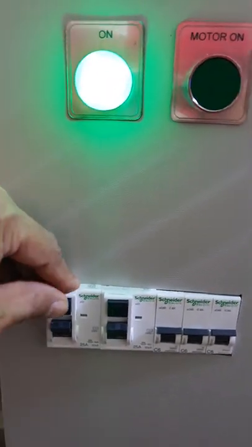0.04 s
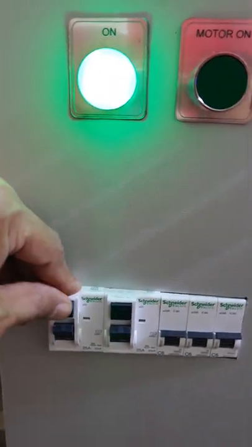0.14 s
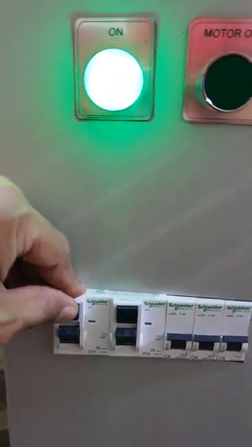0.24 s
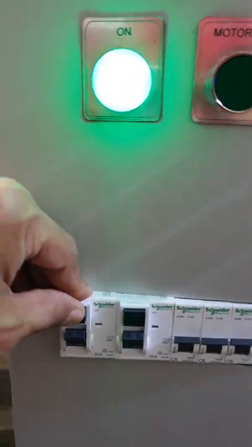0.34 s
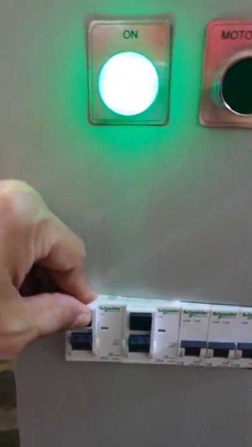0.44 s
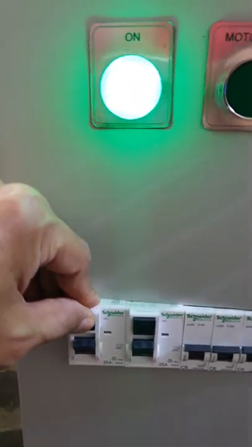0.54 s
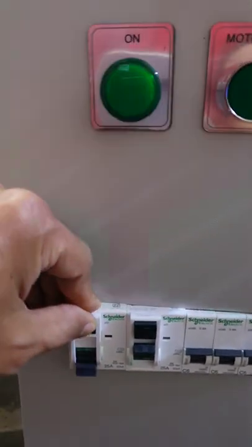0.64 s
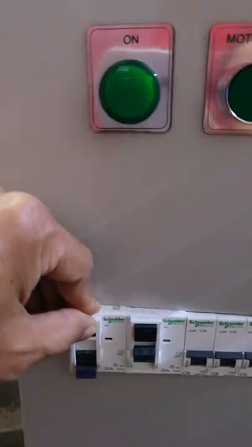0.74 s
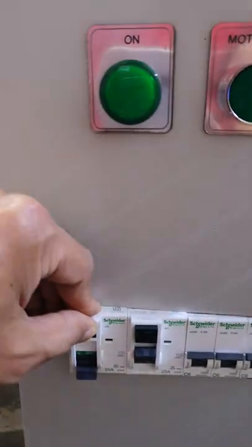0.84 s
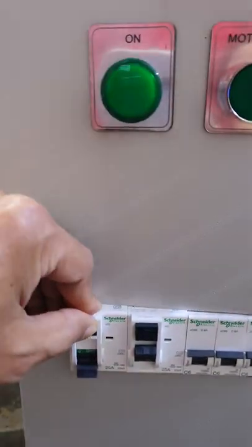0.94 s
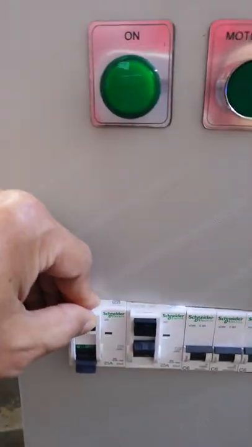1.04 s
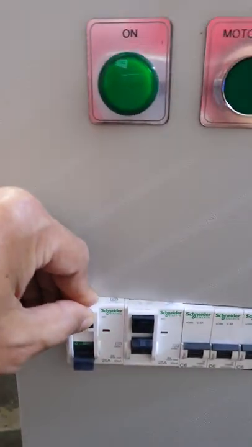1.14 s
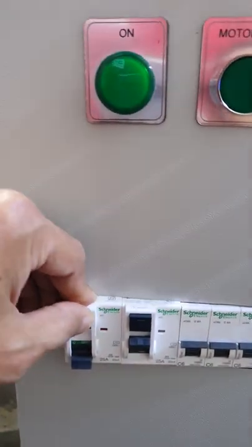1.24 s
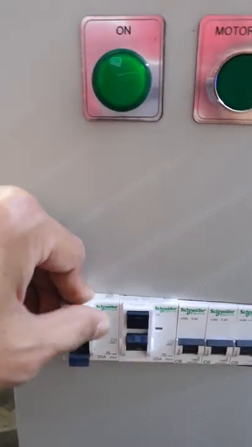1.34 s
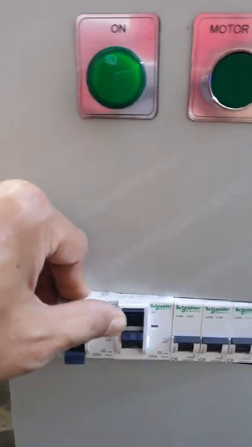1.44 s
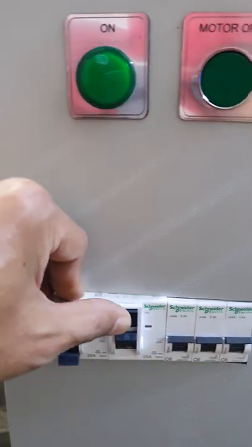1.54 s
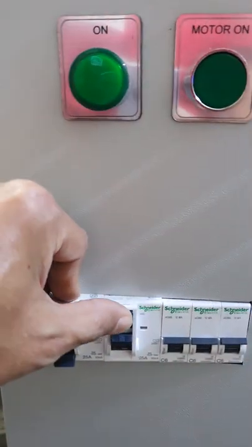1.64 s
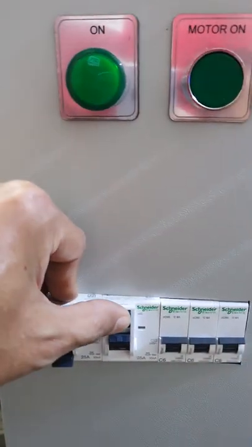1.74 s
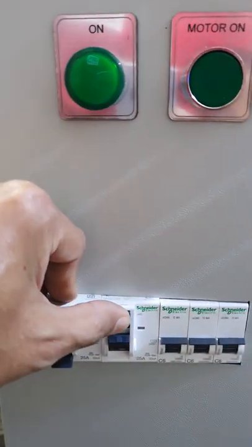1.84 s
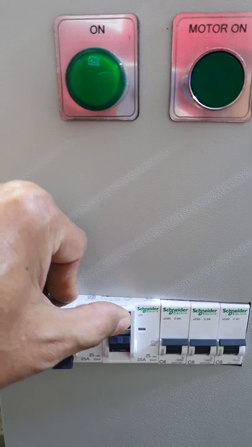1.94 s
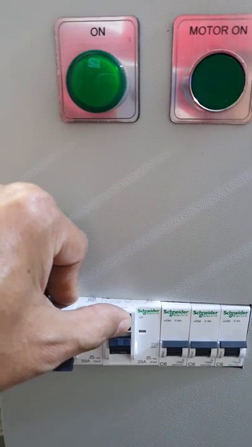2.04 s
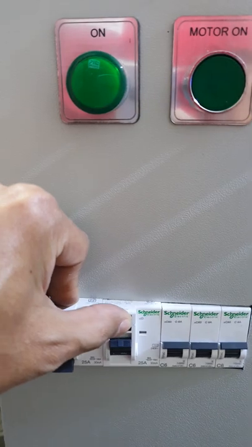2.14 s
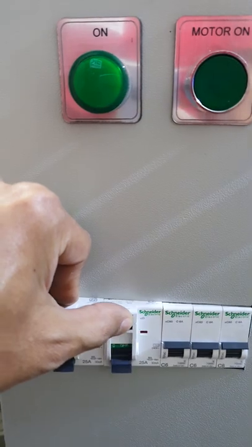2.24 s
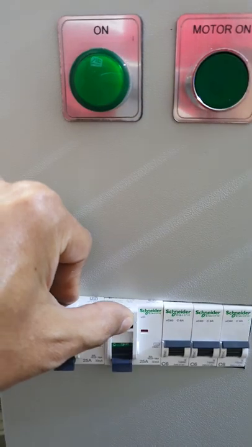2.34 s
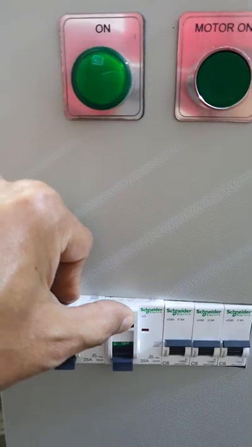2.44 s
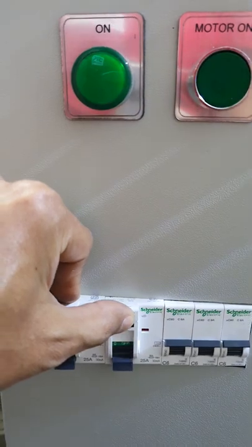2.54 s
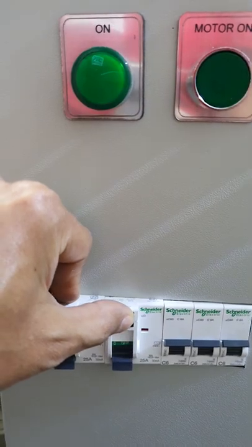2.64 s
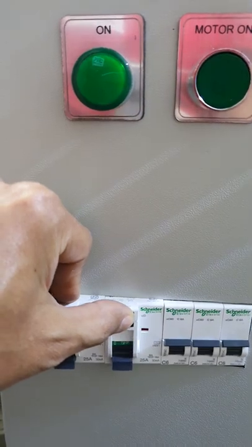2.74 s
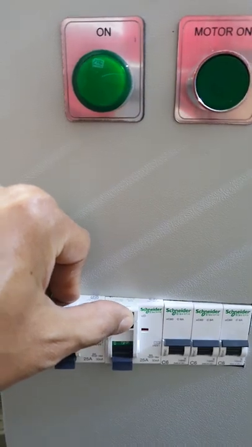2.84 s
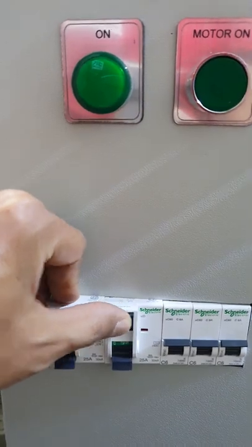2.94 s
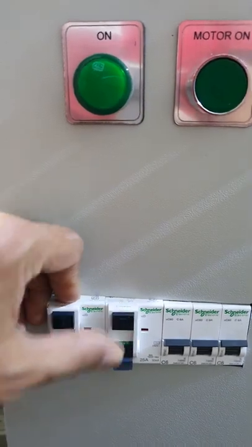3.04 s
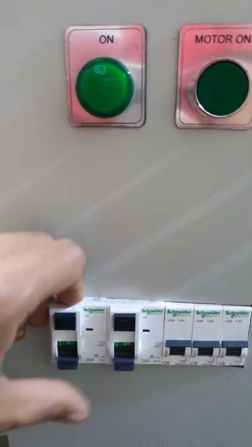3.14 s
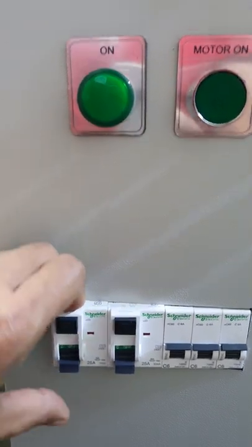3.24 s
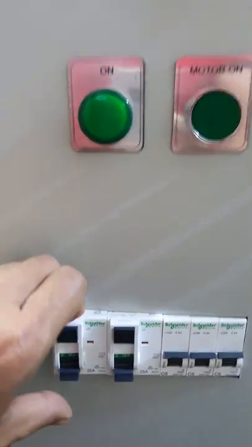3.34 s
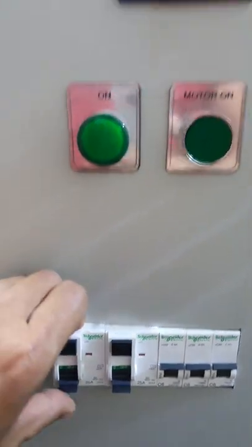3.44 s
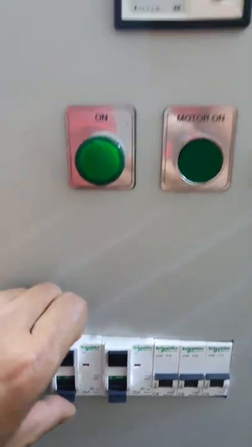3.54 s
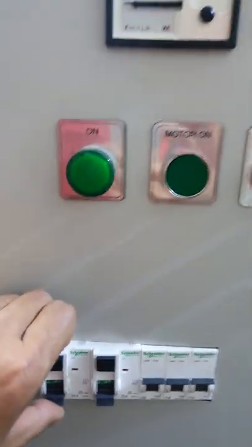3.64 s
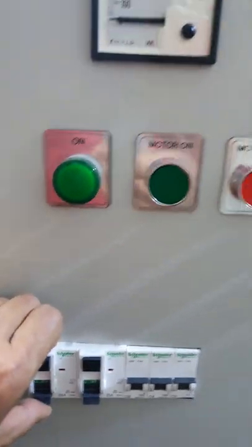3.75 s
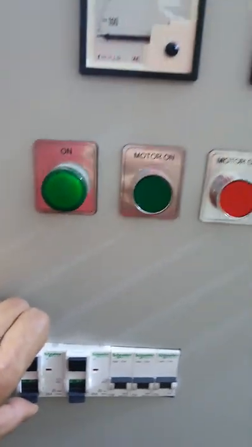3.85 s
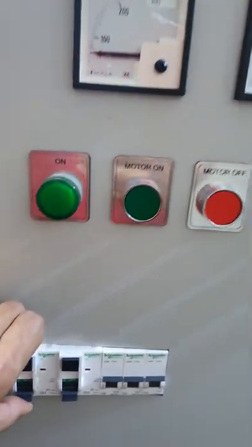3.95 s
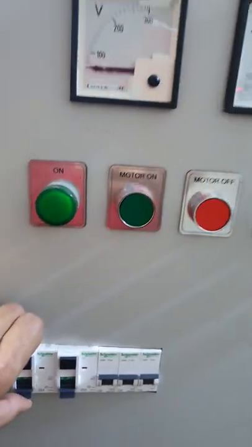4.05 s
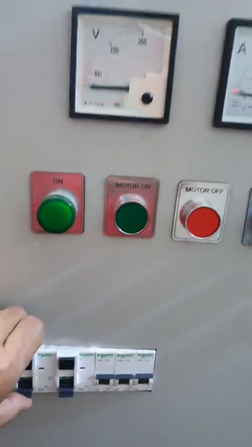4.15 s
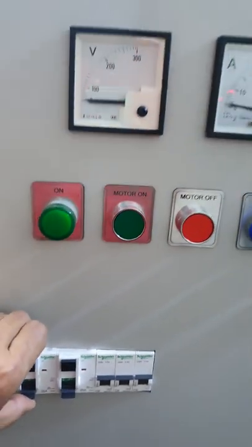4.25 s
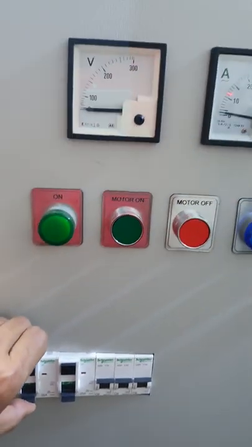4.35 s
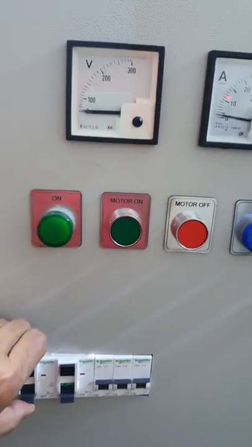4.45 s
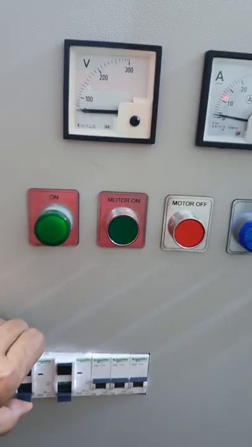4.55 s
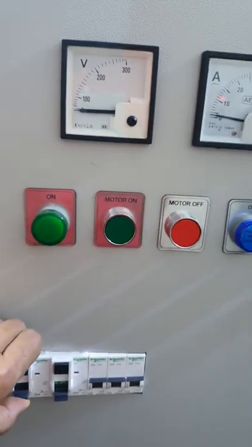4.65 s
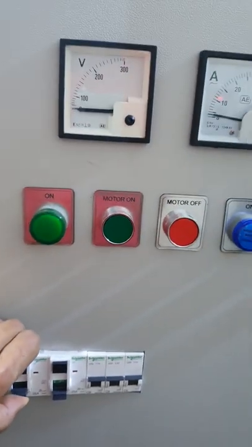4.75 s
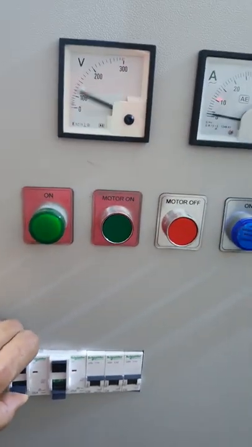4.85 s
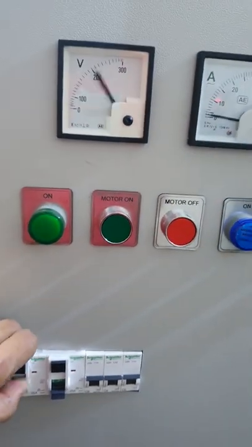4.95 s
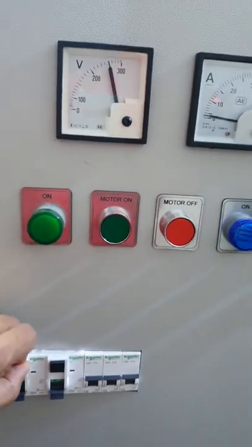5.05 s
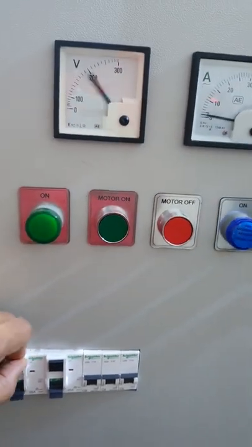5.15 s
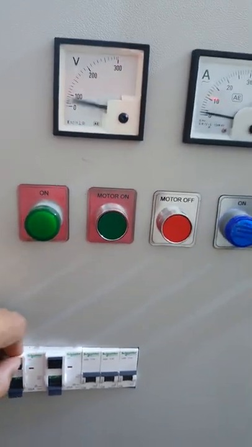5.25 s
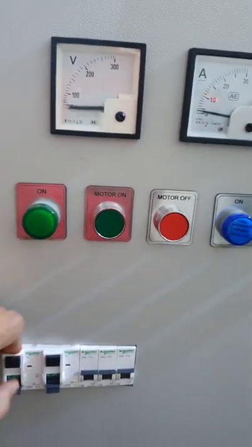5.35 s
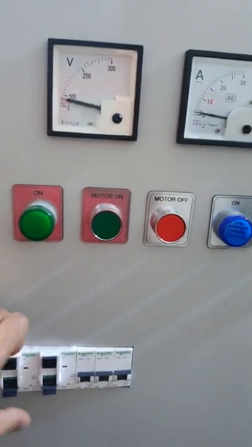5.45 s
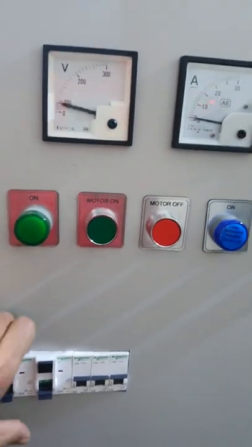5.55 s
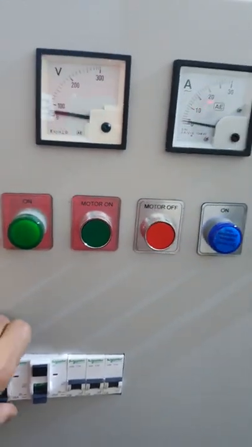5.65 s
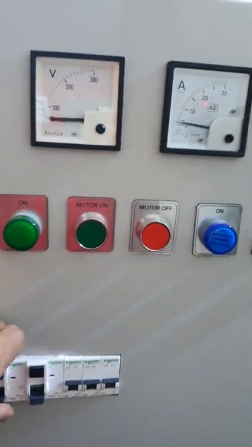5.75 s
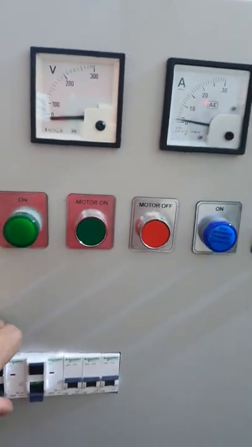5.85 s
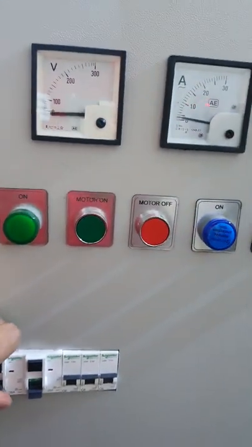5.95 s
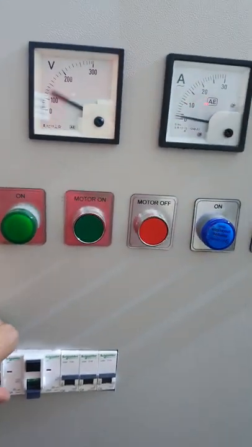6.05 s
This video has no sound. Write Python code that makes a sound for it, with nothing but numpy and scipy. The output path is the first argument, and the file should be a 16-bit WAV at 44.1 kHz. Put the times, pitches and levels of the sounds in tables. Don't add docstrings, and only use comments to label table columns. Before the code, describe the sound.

A phone held close to a sheet-steel electrical panel in a hard-walled plant room. Throughout there is a low, slightly swelling hum with soft hiss and two faint, wavering high whines around 2 kHz and above, from distant machines. A barely audible finger touch comes at 0.2 s. At 0.62 s a breaker lever drops: a loud, dense plastic clack of several tiny blows, followed by a hollow metal boom and about half a second of room ring. A crisp dry tick comes at 1.27 s. At 2.25 s a second, similar clack falls, its boom a little fuller. Quiet machine whine until light ticks at 4.8-4.9 s, then three quick knocks at 4.94, 4.98 and 5.02 s, the last hardest, with a short spring creak and ringing steel. Small ticks follow at 5.27 and 5.64 s, with faint touches near 5.95 s and a weak knock at 6.08 s as it ends.

```python
import sys
import numpy as np
from scipy import signal
from scipy.fft import rfft, irfft
from scipy.io import wavfile
from scipy.ndimage import uniform_filter1d

SR = 44100
rng = np.random.default_rng(int(sys.argv[2]) if len(sys.argv) > 2 else 0)


def to_linear_factor(level_db):
    exponent = np.asarray(level_db, float) / 20
    return 10 ** exponent


def wrap_up_sound(samples):
    columns = np.atleast_2d(samples).T
    tamed = np.clip(columns, -1, 1)
    steps = np.round(tamed * 32767).astype(np.int16)
    wavfile.write(sys.argv[1], SR, steps)


N = 269010
T = np.arange(N) / SR


def along(points, hz):
    f, v = np.transpose(points)
    return np.interp(np.log(np.maximum(hz, 1)), np.log(f), v)


def colour(x, points):
    c = irfft(np.log(to_linear_factor(along(points, np.fft.rfftfreq(2048, 1 / SR)))))
    c[1:1024] = 2 * c[1:1024]
    c[1025:] = 0
    response = irfft(np.exp(rfft(c)))
    return signal.fftconvolve(x, response[None], axes=1)[:, :x.shape[1]]


def fade(t, t60):
    return np.exp(-np.log(1000) * t / t60)


def ring(modes, seconds):
    t = np.arange(int(seconds * SR)) / SR
    return sum(to_linear_factor(db) * np.sin(2 * np.pi * hz * t) * fade(t, t60) for hz, db, t60 in modes)


def add(out, s, x):
    i = int(s * SR)
    out[:, i:i + x.shape[1]] += x[:, :N - i]


def sides(pan_db):
    return to_linear_factor(np.array([pan_db, -pan_db]) / 2).reshape(2, -1)


def walk(rate):
    k = int(SR / rate)
    held = np.repeat(rng.standard_normal(N // k + 1), k)
    return 1.3 * uniform_filter1d(uniform_filter1d(held, k), k)[:N]


# f/Hz, likeness/0-1
PORT_LIKENESS = [(60, 0.95), (130, 0.8), (290, 0.3), (640, 0.5), (1400, 0), (16000, 0.23)]


def pair(size):
    alike = np.clip(along(PORT_LIKENESS, np.fft.rfftfreq(size, 1 / SR)), 0, 1)
    mid, side = rfft(rng.standard_normal((2, size)))
    return np.sqrt((1 + alike) / 2) * mid + np.sqrt((1 - alike) / 2) * side * np.array([[1], [-1]])


# f/Hz, level/dB per Hz
HUM_TONE = [(25, -28), (70, 1.5), (130, -6), (250, -12.5), (500, -14.5), (900, -18), (1400, -22),
            (1900, -16.5), (3200, -22.5), (4000, -30), (5000, -40), (6900, -45), (7150, -51.5),
            (13000, -47.5), (16500, -60.5)]
# t/s, level/dB about the mean
PLANT_LEVEL = [(0, 3), (.5, 1), (1.2, 0), (1.6, 0), (1.69, -1.5), (1.8, 0), (2.2, 2.5), (2.7, 0.5),
               (3.11, -1.5), (3.42, -2), (3.5, 0.5), (4.3, 1), (4.6, 1), (4.9, 2), (5.5, -1.5), (5.95, -1),
               (6.05, -0.5)]
# t/s, left minus right/dB
PHONE_TURN = [(0, -4), (.3, -6), (.55, -4), (1.1, -4), (1.6, 2), (2.7, 0), (3.1, -2.5), (3.45, -6.5),
              (4.2, -5), (5.6, -11.5), (6.05, -9)]
# f/Hz, level/dB, wander/Hz, gain/dB per dB the phone turns left
WEAK_LINES = [(140, -68, 6, 0), (204.6, -73, 7, 0), (263.8, -72, 3, 0), (392, -76, 4, .3),
              (1070, -80, 1, -.5), (1110, -76, .5, 0), (1604, -77, .6, -.2), (2272, -81, .6, -.9),
              (2363, -80, 3, 0), (2638, -76, .6, .8), (3208, -81, .8, .3), (3332, -82, .8, 0),
              (500.6, -79, 3, 0), (2541, -88, .6, -.8), (2805, -86, .6, -.9), (3467, -85, 1, .4),
              (3860, -89, 2, 0), (4150, -90, 1, .3)]


def hum():
    hz, noise, out = np.fft.rfftfreq(N, 1 / SR), pair(N), 0
    plant_db, rumble_db = np.interp(T, *np.transpose(PLANT_LEVEL)), 2.9 * walk(5)
    noise = noise * to_linear_factor(along(HUM_TONE, hz) - 34)
    for centre in 30 * 2. ** np.arange(10):
        share = np.clip(1 - abs(np.log2(np.maximum(hz, 1) / centre)), 0, 1)
        swell_db = 1.3 * plant_db + rumble_db if centre < 200 else plant_db
        reach = np.clip(3500 / centre, 0, 1)
        out = out + irfft(noise * share, N) * to_linear_factor(reach * (swell_db + 0.65 * walk(2.5)))
    turn_db = np.interp(T, *np.transpose(PHONE_TURN))
    for line_hz, db, wander_hz, facing in WEAK_LINES:
        phase = 2 * np.pi * np.cumsum(line_hz + wander_hz * walk(8)) / SR
        lag = min(line_hz / 1500, .7)
        level = to_linear_factor(db + facing * turn_db + 5.5 + 0.99 * walk(1.6))
        out = out + level * np.sin(phase + np.array([[lag], [-lag]]))
    return out


# t/s, 4th harmonic level/dB, 5th harmonic level/dB
WHINE_A = [(0, -68, -62.5), (.5, -67.5, -67), (1.1, -68.5, -70.5), (1.699, -66, -76), (2.2, -62, -68.5),
           (2.9, -64.5, -68), (3.15, -66.5, -73.5), (3.5, -65, -75), (3.74, -60.5, -88), (3.95, -61.5, -72),
           (4.2, -79.5, -62), (4.88, -81, -61.5), (5.45, -73, -63.5), (5.7, -72.5, -70),
           (6.05, -72.5, -62.5)]
WHINE_B = [(0, -70, -56.5), (.25, -75, -59), (.95, -76.5, -63.5), (1.401, -76, -65.5), (1.65, -68, -67),
           (1.9, -69.5, -73.5), (2.2, -64, -70.5), (2.7, -67.5, -68), (3.05, -67.5, -75.5),
           (3.37, -70.5, -66.5), (3.58, -65.5, -64), (3.77, -60, -70), (3.91, -59.5, -61),
           (4.31, -64.5, -59), (4.88, -66, -59.5), (5.55, -67.5, -66.5), (5.77, -67.5, -62),
           (6.05, -65.5, -62.5)]


def whine(start_hz, creep, table, fifth_turn):
    s, fourth_db, fifth_db = np.transpose(table)
    turn_db = np.interp(T, *np.transpose(PHONE_TURN))
    phase = 2 * np.pi * np.cumsum(start_hz + creep * T + 0.92 * walk(12)) / SR
    out = 0
    for ratio, db, pan_db in ((1, fourth_db, turn_db), (5 / 4, fifth_db, -2.5 + fifth_turn * turn_db)):
        lag = .6 + .12 * walk(1.5)
        level = to_linear_factor(np.interp(T, s, db) + 4.5 + walk(11))
        out = out + level * sides(pan_db) * np.sin(ratio * phase + np.array([lag, -lag]))
    return out


# f/Hz, t60/s, level/dB
ROOM_RING = [(252, .6, -41), (500, .55, -28.5), (1007, 0.45, -26), (2000, .42, -30.5), (4000, 0.37, -28),
             (5900, .37, -33), (9000, .32, -33.5), (13960, .27, -31.5)]
# f/Hz, level/dB
CASE_TONE = [(150, -33), (400, -10.5), (900, -11), (1250, -7.5), (1600, -8.5), (2500, -3.5), (3500, -7),
             (4600, -9), (5800, -8.5), (7000, -14.5), (7600, -21), (12000, -17.5), (15400, -26.5),
             (16500, -48)]


def room(feeds):
    late_db, late_stretch = -15, 1.515
    hz, t = np.fft.rfftfreq(N, 1 / SR), T[::32]
    f, t60, db = np.transpose(ROOM_RING)
    noise, out = pair(N), 0
    noise = noise * to_linear_factor(2.2 * walk(120)[:len(hz)])
    age = np.maximum(t - np.array([[s] for s, _ in feeds]), 0)
    for centre in 125 * 2 ** np.arange(0, 7.6, .5):
        share = np.clip(1 - 2 * abs(np.log2(np.maximum(hz, 1) / centre)), 0, 1)
        feed_db = np.array([[along(points, centre)] for _, points in feeds])
        gain = to_linear_factor(feed_db + along(np.c_[f, db], centre))
        ring_s = along(np.c_[f, t60], centre)
        decay = fade(age, .85 * ring_s) + to_linear_factor(late_db) * fade(age, late_stretch * ring_s)
        swell = gain * decay * (1 - np.exp(-age / 0.0075))
        level = np.interp(T, t, np.sqrt((swell ** 2).sum(0)))
        out = out + irfft(noise * share, N) * level * to_linear_factor(1.6 * walk(45))
    return colour(out, CASE_TONE)


# t/s, level/dB, rise/s,
# grip (0 first lever drops, 1 second lever drops, 2 lever closes, 3 light knock)
DOOR_SHOCKS = [
    (.618, 5.5, 0.019, 0),
    (2.250, 5.5, 0.028, 1),
    (4.535, -25, .045, 2),
    (4.941, 0.5, 0.016, 3),
    (4.98, -3.5, 0.0095, 3),
    (5.023, 1.5, 0.011, 2),
    (6.084, -6.5, 0.0068, 3),
]
# f/Hz, t60/s, level/dB for grips 0, 1, 2
DOOR_MODES = [(53, 1.7, -39, -41, -58), (72.07, .8, -43, -43, -51.5), (115, .6, -29.5, -30.5, -34.5),
              (143.5, 0.53, -36, -26.5, -41.5), (164.7, .64, -26.5, -20.5, -26.5),
              (171.14, .3, -15, -23, -25), (194.3, 0.3, -23.5, -18.5, -16), (219.2, 1.065, -30, -34, -30.5),
              (260.3, .5, -31, -31, -35), (302, 0.38, -32, -34.5, -35.5), (335, 0.65, -33, -31, -29.5),
              (396.5, 0.7, -30.5, -25, -31.5), (425, 0.59, -35.5, -32.5, -26),
              (455.4, 0.49, -33.5, -37.5, -36), (504, .35, -37.5, -33.5, -50),
               (553, 0.48, -45, -30, -50.5), (589.4, .45, -32.5, -37.5, -49.5),
               (635, 0.43, -41, -34.5, -41), (740, 0.2, -37, -27.5, -31.5), (748, .3, -39.5, -49, -29.5),
               (887, 0.34, -41, -39.5, -38.5), (1184, 0.1192, -24.5, -23, -40),
               (1250, 0.13, -22.5, -25.5, -31)]
# f/Hz, level/dB
KNOCK_TONE = [(75, -57.5), (110, -34), (250, -36.5), (400, -32), (550, -54.5), (700, -33.5), (1250, -36)]


def door():
    slow = 10
    out, t = np.zeros((2, N)), T[:88200:slow]
    table = np.array(DOOR_MODES)
    table = np.c_[table, along(KNOCK_TONE, table[:, 0])]
    hz, t60 = table[:, :1], table[:, 1:2]
    for s, db, rise, grip in DOOR_SHOCKS:
        build = 1 - np.exp(-t / (rise * (t60 / .35) ** 1.2))
        level = to_linear_factor(table[:, 2 + round(grip), None] + db) * fade(t, t60) * build
        boom = 0
        for share, spread in ((0.88, 0.001), (0.5, .03), (0.54, .06), (0.42, .012)):
            start, skew, detune = rng.standard_normal((3, len(hz), 1))
            phase = 2 * np.pi * hz * (1 + spread * detune) * t + 2 * start
            skew = skew * np.minimum((hz / 420) ** 3, 2)
            gain = share * level * np.exp(-t * spread * 60)
            boom = boom + np.array([(gain * np.sin(phase + k * skew)).sum(0) for k in (1, -1)])
        add(out, s, signal.resample_poly(boom, slow, 1, axis=1))
    return out


# t/s, peak level/dB, left minus right/dB, share sent to the room/dB, lever ring/dB
LEVER_TICKS = [
    (0.2244, -68, 1, 14, -14),
    (1.2438, -67.5, 3.5, 14.5, -14),
    (1.2737, -40, 4, 8.5, -27),
    (4.8189, -56.5, -10, 21, -11),
    (4.8903, -54, -4.5, 7, -14),
    (5.268, -45.5, -6, 11, -18),
    (5.6391, -54.5, -1, 18, -19),
    (5.9214, -63.5, -1, 21.5, -18),
    (5.9644, -66, -2, 20, -12),
    (6.014, -59, -1, 19, -4),
]
# f/Hz, level/dB, t60/s
LEVER_MODES = [(2300, -10, .008), (4800, 8, 0.016), (6300, -5.5, 0.024), (9600, -7.5, 0.02)]
# f/Hz, level/dB
SNAP_TONE = [(1500, -14), (2200, 4), (4000, 2), (6800, -1.5), (7600, -16.5), (11000, -29), (14000, -29)]
# t/s, length/s, level/dB
SPRING_CREAKS = [
    (4.886, 0.049, -69.5),
    (6.02, 0.03, -75),
]


def ticks():
    near, far, t = np.zeros((2, N)), [], T[:1024]
    for s, db, pan_db, send_db, ring_db in LEVER_TICKS:
        modes = [(hz * (1 + 0.023 * rng.standard_normal()), g + 2 * rng.standard_normal(), t60)
                 for hz, g, t60 in LEVER_MODES]
        snap = rng.standard_normal((2, len(t))) * fade(t, 0.015) + 2.7 * (t == 0)
        snap = colour(snap, SNAP_TONE) * 1.48
        tap = snap + ring(modes, len(t) / SR) * to_linear_factor(ring_db)
        add(near, s, tap * to_linear_factor(db) * sides(pan_db))
        far.append((s, [(hz, g - along(CASE_TONE, hz) + db + send_db + 7.0) for hz, g in SNAP_TONE]))
    t = T[:4096]
    for s, length, db in SPRING_CREAKS:
        slips = rng.standard_normal((2, len(t))) * to_linear_factor(7.2 * rng.standard_normal(len(t))) * (t < length)
        creak = colour(slips, [(4500, -26.5), (5300, 10), (6800, -6), (7600, -25), (9000, -14),
                               (9600, 1), (10300, -16), (12000, -32.5)])
        add(near, s, to_linear_factor(db) * creak)
    return near, far


# t/s, level/dB, rattle t60/s, treble/dB, left minus right/dB
BREAKER_BLOWS = [(0.6143, -16.5, 0.027, -7, -1.5), (0.616, -10, 0.05, -3.5, 2),
                 (0.619, -8.5, 0.014, 0.5, 5), (0.6216, -10, 0.031, -7, -6.5),
                 (2.2459, -15.5, 0.048, -14, 1.5), (2.247, -17, 0.047, 4.5, 3),
                 (2.2496, -9, 0.0085, 4.5, -9.5), (2.2530, -19.5, 0.03, -0.5, -1.5),
                 (4.9407, -9.5, 0.035, 0, -3.5), (4.9801, -14.5, 0.059, -3.5, -1.5),
                 (5.0207, -15, 0.034, -0.5, -13.5), (5.0222, -9, 0.0323, -1.5, -1),
                 (5.024, -7, .02, -4, -4), (5.027, -15, 0.03, -4, -2.5), (6.0829, -30.5, 0.016, -0.5, -5.5),
                 (6.089, -46, 0.06, -6, 3.5), (2.271, -19, 0.0407, 5.5, -6)]
# f/Hz, level/dB, t60/s
CASE_MODES = [(1248, -13.5, 0.16), (2525, -10.5, .02), (2980, -7.5, 0.017), (4080, -13, 0.03),
              (5300, -12, .015), (5850, -17, .015), (12000, -15.5, .012)]


def breakers():
    near, far, t = np.zeros((2, N)), [], T[:2048]
    body = ring(CASE_MODES, 0.16)[None] * to_linear_factor(-31.5)
    body[0, 0] = 1
    for s, db, t60, treble_db, pan_db in BREAKER_BLOWS:
        spikes = rng.standard_normal((3, len(t))) * to_linear_factor(4.72 * rng.standard_normal(len(t)))
        rattle = (.6 * spikes[0] + spikes[1:]) * fade(t, t60)
        energy = (rattle ** 2).sum(1, keepdims=True)
        rattle = rattle / np.sqrt(energy / (fade(t, t60) ** 2).sum()) * 1.59
        rattle[:, 0] = 4.5
        rattle = rattle * to_linear_factor(db + 8.5)
        light = any(abs(s - shock[0]) < .02 and shock[3] == 3 for shock in DOOR_SHOCKS)
        air_db = -8 * light
        top = colour(rattle * fade(t, 0.02), [(6000, -26), (7800, treble_db + 3.5), (10500, treble_db + 2.0),
                                              (12500, treble_db + 3.0 + air_db)])
        rattle = colour(rattle, [(7200, -0.5), (8600, -34.5)]) + top
        rattle = colour(rattle, [(600, -8.0), (1100, -2.5)])
        add(near, s, rattle * sides(pan_db))
        send_db = 0.3 - .3 * treble_db
        energy_db = db + send_db + 10 * np.log10(t60 * SR) - 3.0
        top_db = energy_db + treble_db
        far.append((s, [(6800, energy_db), (8300, top_db + 2.0), (10500, top_db + 0.5),
                        (12500, top_db + air_db)]))
    return signal.fftconvolve(colour(near, CASE_TONE), body, axes=1)[:, :N], far


# f/Hz, left minus right/dB
PORT_TONE = [(60, 1.5), (150, 2.5), (380, -2.5), (700, 3.5), (1290, 1.5), (2380, 0.5), (5500, -1),
             (8500, 14), (12000, 13.5), (15000, 11.5)]


def scene():
    plant = hum() + whine(2134.7, .85, WHINE_A, -.3) + whine(2217.2, 1.0, WHINE_B, .25)
    blows, blows_far = breakers()
    taps, taps_far = ticks()
    hits = blows + taps + door() + room(blows_far + taps_far)
    left = colour(hits[:1], [(hz, db / 2) for hz, db in PORT_TONE])
    right = colour(hits[1:], [(hz, -1.1 * db / 2) for hz, db in PORT_TONE])
    return np.vstack([left, right]) + plant


def roll_off(x):
    return signal.sosfilt(signal.butter(12, 16800, fs=SR, output="sos"), x)


def record(dry):
    soft = np.tanh(0.77 * dry) / 0.81
    top = signal.cheby2(10, 40, 16500, fs=SR, output="sos")
    mix = signal.sosfilt(top, soft)
    return roll_off(mix)


dry = scene()
out = record(dry)
wrap_up_sound(out)
```